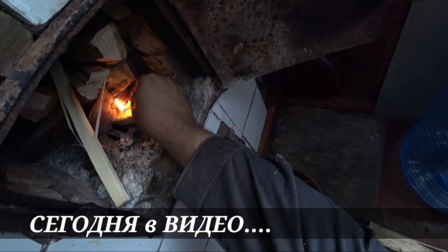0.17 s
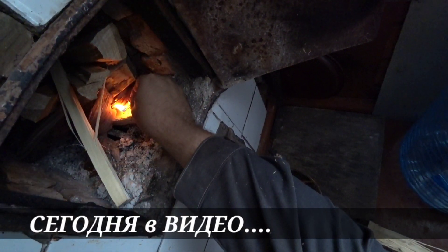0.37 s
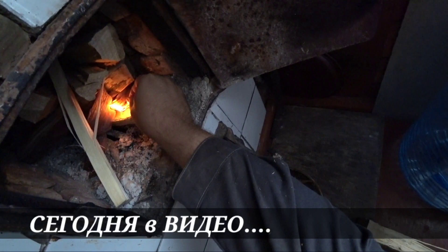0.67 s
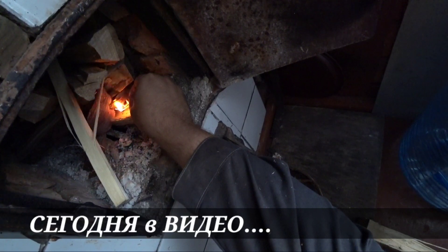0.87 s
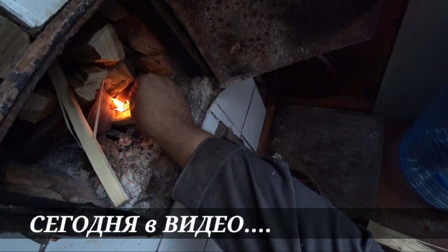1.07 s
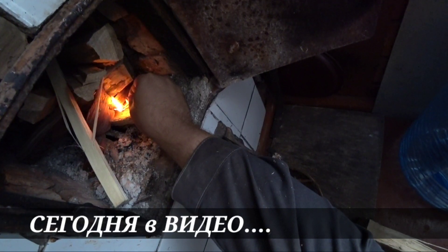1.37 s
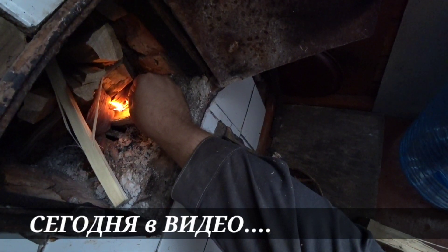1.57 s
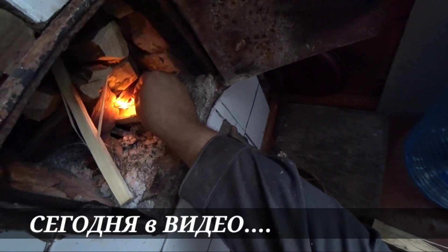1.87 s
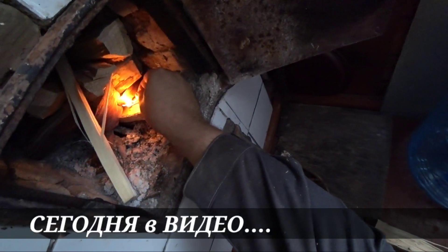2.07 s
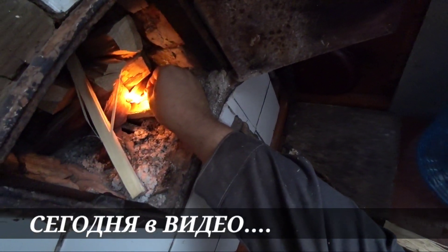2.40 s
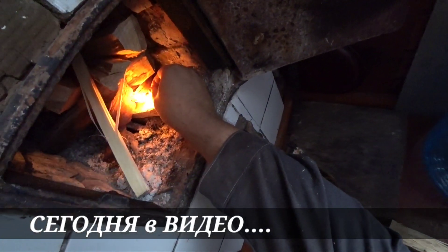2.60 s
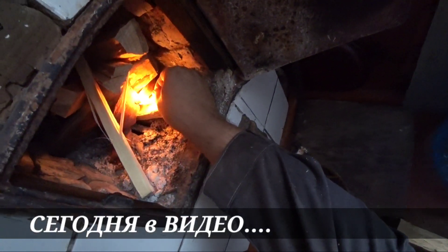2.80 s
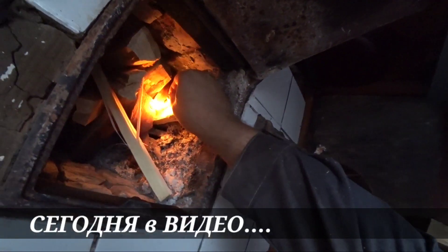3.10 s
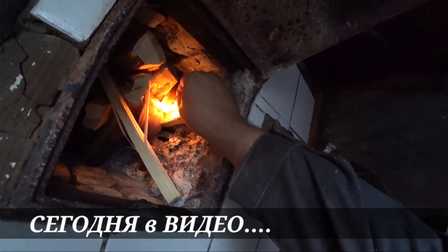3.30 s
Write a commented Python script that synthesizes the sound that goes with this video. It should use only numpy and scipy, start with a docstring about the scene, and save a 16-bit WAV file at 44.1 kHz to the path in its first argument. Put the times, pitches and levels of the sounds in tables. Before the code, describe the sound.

Thin kindling crackles in a brick stove firebox, close up, slightly left, with short hollow bounces and a small-room echo. Until 1.5 seconds, sparse dry snaps mix with light stick rustles and a soft knock at 0.8. From 1.8 crackle thickens; strong snaps come near 2.45 and 2.9, the loudest, with a bright splinter twang, at 3.15. Low wavering hum and air noise persist; flame flutter swells late, as smaller snaps continue to 3.4.

```python
"""Thin kindling catches fire in the open firebox of a brick stove, close to the microphone.
At first sparse snaps of gas pockets, rustles and knocks of hand-held sticks, over room noise and low flame flutter.
Then the snaps and faint crackle crowd together and grow louder, and the loudest snap twangs a splinter near the end.
Snaps are minimum-phase pulses through resonances, rustles are clumps of such pulses, flame and air are shaped noise.
Decaying random reflections give the firebox bounces and the room echo."""
import sys
import numpy as np
from scipy import signal
from scipy.fft import rfft, irfft
from scipy.io import wavfile
from scipy.ndimage import uniform_filter1d

SR = 44100
rng = np.random.default_rng(int(sys.argv[2]) if len(sys.argv) > 2 else 0)


def transcribe(u):
    """Save the signal u as a 16-bit wav file named by the first command-line argument.

    u: samples, shape (n,) or (channels, n), limited to [-1, 1]; the rate is SR.
    q: integer samples, one column per channel.
    """
    v = np.clip(np.atleast_2d(u).T, -1, 1)
    q = np.round(v * 32767).astype(np.int16)
    wavfile.write(sys.argv[1], SR, q)


N = 152145  # length in samples


def amp(db):
    """Logarithmic level: decibels to amplitude gain."""
    return 10 ** (np.asarray(db) / 20)


def evened(x):
    """Power normalisation: scales to rms 1."""
    return x / np.sqrt(np.mean(x ** 2) + 1e-20)


def read(points, hz):
    """Logarithmic pitch scale: interpolates (frequency, value) points along log frequency."""
    f, value = np.transpose(points)
    return np.interp(np.log(hz + 1), np.log(f + 1), value)


def add(mix, start_s, sound):
    """Superposition: sums a stereo sound into the mix from start_s on."""
    part = mix[:, max(round(start_s * SR), 0):][:, :sound.shape[1]]
    part += sound[:, :part.shape[1]]


def coloured(x, points):
    """Linear filtering: multiplies the spectrum by a gain curve given in dB."""
    hz = np.fft.rfftfreq(len(x), 1 / SR)
    return irfft(rfft(x) * amp(read(points, hz)), len(x))


def pulse(db):
    """Minimum phase: the sharpest causal pulse whose spectrum has these levels."""
    log_gain = np.log(amp(np.r_[db, db[-2:0:-1]]))
    # the Hilbert transform of log gain supplies the phase
    return np.fft.ifft(np.exp(np.conj(signal.hilbert(log_gain)))).real


def scatter(decay_s, start_s, size):
    """Diffuse reflection: dense random taps, falling by a factor e per decay_s, total energy 1."""
    t = np.arange(size) / SR
    taps = rng.standard_normal(size) * np.exp(-t / decay_s) * (t > start_s)
    return taps / np.linalg.norm(taps)


# room noise common to both sides: pitch_hz [Hz], density_db [dB per Hz]
AIR_MID = [(10, -80.5), (25, -76), (45, -86.5), (80, -86), (115, -93.5), (1300, -106), (2400, -103),
           (3200, -108), (7000, -108), (8000, -114), (15500, -116)]
# background noise opposed between the sides: pitch_hz [Hz], density_db [dB per Hz]
AIR_SIDE = [(20, -114), (120, -97), (420, -92.5), (1000, -93.5), (1900, -97), (3600, -108), (7000, -110),
            (15500, -123)]
HUM_HZ, HUM_WAVER_HZ, HUM_DB = 63.4, 2.64, -68.5  # mean pitch, rms pitch deviation, rms level


def air():
    """Stationary noise plus frequency modulation: steady background noise, partly opposed between the sides,
    with a low wavering hum."""
    mid, side = (coloured(rng.standard_normal(N), points) * np.sqrt(SR / 2)
                 for points in (AIR_MID, AIR_SIDE))
    waver = evened(coloured(rng.standard_normal(N), [(1, -3.0), (5, 1), (30, -52), (300, -100)]))
    phase = 2 * np.pi * np.cumsum(HUM_HZ + HUM_WAVER_HZ * waver) / SR
    mid = mid + amp(HUM_DB) * evened(np.sin(phase))
    return np.array([mid + side, mid - side])


# reverberation time, for a 60 dB fall: pitch_hz [Hz], decay_s [s]
ROOM_T60 = [(500, 0.19), (5000, 0.15), (16000, 0.099)]
ROOM_DB, NEAR_DB, NEAR_S = -17.5, -16.5, 0.0082  # late and near echo energy; near decay by a factor e
ECHO_START_S = 0.003


def tail(size=16384):
    """Reverberation: quick echoes from the stove front, then the room dying away band by band."""
    hz, t, bands = signal.stft(rng.standard_normal(size), SR, nperseg=256)
    fading = bands * amp(-60 * t / read(ROOM_T60, hz)[:, None])
    late = signal.istft(fading, SR, nperseg=256)[1][:size]
    late = late * (np.arange(size) / SR > ECHO_START_S)
    near = scatter(NEAR_S, ECHO_START_S, size)
    return amp(ROOM_DB) * late / np.linalg.norm(late) + amp(NEAR_DB) * near


# width of the echo: pitch_hz [Hz], side_over_mid_db [dB]
ROOM_SIDE = [(100, -4), (400, -4), (1300, 4), (4500, 2.5), (12000, 7)]


def room(x):
    """Decorrelated reflections: separate mid and side echoes spread the room across both sides."""
    mid, side = (signal.fftconvolve(x.mean(0), taps)[:N] for taps in (tail(), tail()))
    side = coloured(side, ROOM_SIDE)
    return np.array([mid + side, mid - side])


# mean flame level over time: start_s [s], level_db [dB]
FLAME = [(0, -72), (1.5, -74), (1.9, -70.5), (3.1, -63)]
# colour of the flame noise before normalisation: pitch_hz [Hz], level_db [dB]
FLAME_COLOUR = [(20, -23), (90, 2.5), (160, -2.5), (230, -13), (350, -4), (425, 0), (520, -8.5), (880, -11),
                (1200, -12.5), (4500, -19), (16000, -32)]
FLUTTER_DB = 3  # rms swing of the level


def flame():
    """Amplitude-modulated noise: the growing flame flutters in the hollow of the firebox."""
    slow_noise = coloured(rng.standard_normal(N), [(1, 3), (30, -14), (120, -41), (1000, -100)])
    flutter = evened(slow_noise)
    level_db = np.interp(np.arange(N) / SR, *np.transpose(FLAME)) + FLUTTER_DB * flutter
    return amp(level_db) * evened(coloured(rng.standard_normal(N), FLAME_COLOUR))


# sticks rubbing: start_s [s], length_s [s], level_db [dB, upper limit of a grain before snap colour]
RUSTLES = [(.535, 0.027, -33.5), (1.043, .03, -37), (1.345, .04, -30), (1.548, .03, -28.5)]
# sticks knocking together: start_s [s], level_db [dB, added to the knock colour]
KNOCKS = [(.812, -6.5), (2.452, -11.5)]
# colour of a knock: pitch_hz [Hz], level_db [dB]
KNOCK = [(60, -20), (200, -7.5), (340, 3), (650, -10.5), (2000, -9.5), (3000, -21), (16000, -29)]
GRAINS_PER_S, GRAIN_TREBLE_DB, GRAIN_BODY_DB = 450, -6.5, -1.5
KNOCK_ECHO_DB, KNOCK_ECHO_S, KNOCK_ECHO_START_S = -5, 0.0043, 0.0027


def handling(size=1024):
    """Friction and impact: sticks rub in clumps of grains and knock together inside the firebox."""
    out = np.zeros((2, N))
    for start_s, length_s, level_db in RUSTLES:
        grains = max(round(length_s * GRAINS_PER_S), 1)
        for place, softness in rng.random((grains, 2)):
            grain = snap(level_db - 9 * softness, GRAIN_TREBLE_DB, GRAIN_BODY_DB, 2.7)
            add(out, start_s + place * length_s, grain)
    for start_s, level_db in KNOCKS:
        knock = pulse(level_db + read(KNOCK, np.fft.rfftfreq(size, 1 / SR)))
        walls = scatter(KNOCK_ECHO_S, KNOCK_ECHO_START_S, size)
        knock = knock + amp(KNOCK_ECHO_DB) * signal.fftconvolve(knock, walls)[:size]
        add(out, start_s, np.array([knock, knock]))
    return out


# faint crackle between the snaps: start_s [s], rate [ticks per s], level_db [dB, mean before snap colour]
CRACKLE = [(0, 24.4, -37.5), (1.5, 50.7, -37.5), (1.85, 189, -32.5), (2.1, 170, -35), (3.45, 242, -34.5)]
TICK_SPREAD_DB, TICK_TREBLE_DB, TICK_TREBLE_SPREAD_DB = 3.5, -8, 3
TICK_BODY_DB, TICK_BODY_SPREAD_DB = 0.5, 2.5


def crackle():
    """Poisson-like process: tiny random ticks that thicken as the fire takes."""
    out = np.zeros((2, N))
    at_s, rate, level_db = np.transpose(CRACKLE)
    chance = np.interp(np.arange(N) / SR, at_s, rate) / SR
    times = np.flatnonzero(rng.random(N) < chance) / SR
    draws = np.clip(rng.standard_normal((len(times), 4)), -2, 2)
    for start_s, (level, treble, body, pan) in zip(times, draws):
        tick = snap(np.interp(start_s, at_s, level_db) + TICK_SPREAD_DB * level,
                    TICK_TREBLE_DB + TICK_TREBLE_SPREAD_DB * treble,
                    TICK_BODY_DB + TICK_BODY_SPREAD_DB * body,
                    2 + pan)
        add(out, start_s, tick)
    return out


# the loudest snap twangs a splinter
SPLINTER_S, SPLINTER_HZ, SPLINTER_DB, SPLINTER_RISE_S = 3.1424, 8300, -13.5, 0.0002


def splinter(size=512):
    """Damped free vibration: a thin splinter springs free and rings for a few cycles."""
    out, t = np.zeros((2, N)), np.arange(size) / SR
    envelope = t / SPLINTER_RISE_S * np.exp(1 - t / SPLINTER_RISE_S)  # peaks at 1
    ring = amp(SPLINTER_DB) * envelope * np.sin(2 * np.pi * SPLINTER_HZ * t)
    add(out, SPLINTER_S, np.array([ring, ring]))
    return out


# basic colour of a snap: pitch_hz [Hz], level_db [dB]
SNAP = [(60, -22.5), (220, -14), (330, -1), (900, -5.5), (1200, -14), (2000, -12.5), (2700, -11),
        (3200, -1.5), (5200, -1.5), (6200, -2.5), (8400, 0), (11000, -3), (15500, -11.5)]
# resonances of firebox and splinters: pitch_hz [Hz], width_hz [Hz], lift_db [dB]
RINGS = [(430, 78, 8.5), (605, 80, 6), (863, 140, 6.5), (2492, 118, 9), (4290, 173, 5), (4855, 450, 4.5)]
BODY_HZ, TREBLE_HZ = (890, 2870), (5100, 8530)  # where the body fades out and the treble sets in
POP_DB, OWN_COLOUR_DB = -1, 2.5  # trim of every snap; rms of its own random colour
# bigger breaks take longer: top dB lost per dB of level above BIG_DB
BIG_DB, BIG_DULLING, TOP_HZ = -11, 0.92, (11800, 13900)
BOUNCE_DB, BOUNCE_S, BOUNCE_START_S = -7, .0013, 0.00061  # the firebox walls throw each snap back


def snap(level_db, treble_db, body_db, pan_db, size=1024):
    """Impulse excitation of resonators: one break in the wood, then bounces off the firebox walls."""
    hz = np.fft.rfftfreq(size, 1 / SR)
    db = read(SNAP, hz) + sum(lift / (1 + (2 * (hz - f) / width) ** 2) for f, width, lift in RINGS)
    db = db + read(list(zip(BODY_HZ, (body_db, 0))), hz)
    db = db + read(list(zip(TREBLE_HZ, (0, treble_db))), hz)
    own_colour = evened(uniform_filter1d(rng.standard_normal(len(hz)), size=24))
    db = db + OWN_COLOUR_DB * own_colour
    dulling = BIG_DULLING * max(level_db - BIG_DB, 0)
    db = db - dulling * read(list(zip(TOP_HZ, (0, 1))), hz)
    direct = pulse(db + level_db + POP_DB)
    bounce = signal.fftconvolve(direct, scatter(BOUNCE_S, BOUNCE_START_S, size))[:size]
    return (direct + amp(BOUNCE_DB) * bounce) * amp([[pan_db / 2], [-pan_db / 2]])


# snaps of the wood: start_s [s], level_db [dB, before snap colour and trim],
# treble_db [relative dB], body_db [firebox body, relative dB]
POPS = [(0.0379, -31.5, 0, -10), (.199, -28, -4, 8.5), (.2157, -27, -1, -16), (.3106, -24, -4, -9),
        (0.4184, -29, -4.5, -6), (0.5484, -18.5, -13, -5), (0.5552, -20, -8.5, -11), (.673, -18.5, -8.5, 1),
        (.8141, -24, -9, 0), (0.839, -22, -7.5, -11), (.8527, -24, -6, -4), (.881, -17, -7.5, -25),
        (.89, -23.5, -7, -19), (1.0316, -13.5, -9.5, -20), (1.0422, -13.5, -7.5, -3),
        (1.063, -23.5, -7, -13), (1.0895, -25, -10, -5), (1.1179, -18.5, -5, -2), (1.1879, -22, -8, 0),
        (1.3527, -26.5, -1.5, -1), (1.371, -25, -15, 2), (1.3945, -29, -10, 5), (1.4486, -16, -6.5, -7.5),
        (1.573, -24, -10, 2), (1.5954, -24.5, -4.5, -11), (1.6403, -22.5, -14, 8), (1.7055, -19, -9, -15),
        (1.7232, -28, -13, 2), (1.7528, -28, -8, -3), (1.7777, -11.5, -19, -8), (1.7903, -20, -8, -6),
        (1.8093, -20.5, -11, 0.5), (1.8696, -19, -7, -26), (1.8834, -9, -15, -11.5),
        (1.9305, -18.5, -8, -2), (1.9714, -19, -8, 0), (1.9777, -17.5, -14, -8), (1.9822, -17, -9.5, -11),
        (2.0096, -26, -6, -4), (2.0605, -18, -4.5, -2.5), (2.0763, -20.5, -6.5, -27),
        (2.1521, -11.5, -4.5, -40), (2.172, -24, -6, 6.5), (2.1797, -28, -9, 1), (2.2154, -21.5, -8, 2),
        (2.239, -20.5, -6, -5), (2.2506, -16.5, -13, -0.5), (2.2525, -14, -15.5, -19),
        (2.3025, -26, -11, 0), (2.32, -21, -4.5, -5), (2.335, -25, -14, -10), (2.3508, -20.5, -10, -4),
        (2.3593, -35, -10, -8), (2.388, -25, -16, -11), (2.4043, -21.5, -6, 5), (2.4224, -23, 1.5, -12),
        (2.4396, -15, -9, -16), (2.452, -2.5, -12, -2), (2.4788, -15.5, -9, -13), (2.4889, -10, -3, -13),
        (2.496, -16.5, -3, 0.5), (2.4988, -12.5, -16, -9), (2.5458, -24.5, -4, 5), (2.5748, -16.5, -21, -8),
        (2.606, -18, -26, -9), (2.6237, -12, -12.5, -16), (2.631, -28, -12, -17), (2.6449, -26, -7, 12.5),
        (2.6761, -22.5, -8, -17), (2.7101, -24, -10, 8.5), (2.7345, -17, -9.5, 1.5),
        (2.7449, -23.5, -20, 6.5), (2.8166, -21.5, -20, -1.5), (2.8609, -13, -8, -24),
        (2.8964, -22, -7, -10), (2.9015, -13.5, -4.5, -4), (2.9208, 1.5, -6.5, -13),
        (2.9538, -13.5, -9.5, -2.5), (2.968, -13, -11, -9), (2.9943, -15, -17, -4), (3.001, -17, -6, -7),
        (3.0216, -22.5, -6, 1.5), (3.036, -24, -5, -11), (3.057, -15.5, -9.5, -7), (3.0781, -12.5, -16, 4),
        (3.1269, -20, -10, 4.5), (3.133, -20, -6, -8), (3.1424, 3, -1.5, -4), (3.1638, -15, -22, -8),
        (3.2232, -29, -8, -2), (3.2427, -22, -17, 9), (3.2687, -23.5, -7, -5), (3.2789, -18.5, -13, 3),
        (3.3372, -20, -11, 7), (3.402, -27.5, -18, 12), (3.433, -26.5, -6, -7)]
# the burning spot moves to the middle: start_s [s], left_over_right_db [dB]
PAN = [(0, 4), (2.2, 3), (3.1, 1.5)]


def pops():
    """Sudden release of pressure: gas pockets burst in the splinters as distinct snaps."""
    out = np.zeros((2, N))
    for start_s, level_db, treble_db, body_db in POPS:
        pan_db = np.interp(start_s, *np.transpose(PAN))
        add(out, start_s, snap(level_db, treble_db, body_db, pan_db))
    return out


def scene():
    """Direct and reverberant sound: wood echoes in the room, the splinter at the stove mouth is direct."""
    steady = air() + flame()
    wood = pops() + handling() + crackle()
    return steady + wood + splinter() + room(wood)


def record(dry):
    """Band limitation: a linear-phase low-pass sets the recorder's upper edge at 15900 Hz."""
    low_pass = signal.firwin(201, 15900, window=("kaiser", 8), fs=SR)
    return signal.oaconvolve(dry, low_pass[None], "same")


dry = scene()
out = record(dry)
transcribe(out)
```